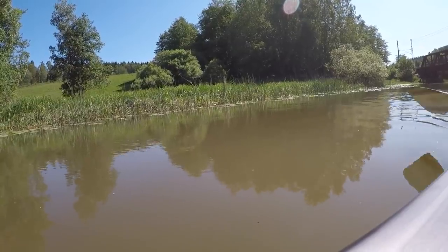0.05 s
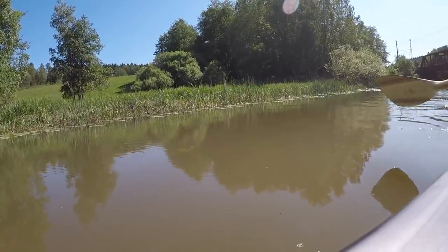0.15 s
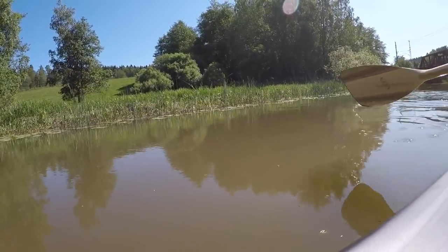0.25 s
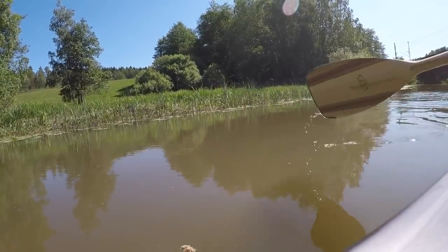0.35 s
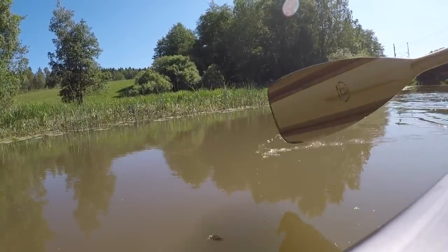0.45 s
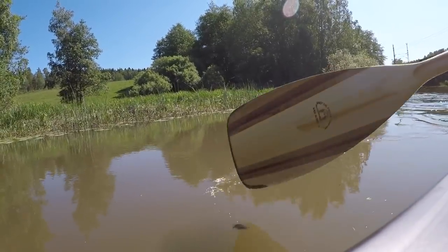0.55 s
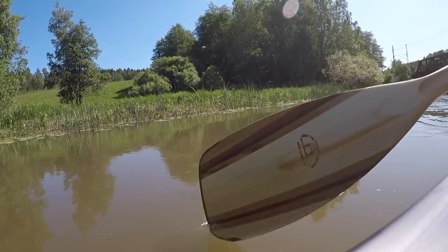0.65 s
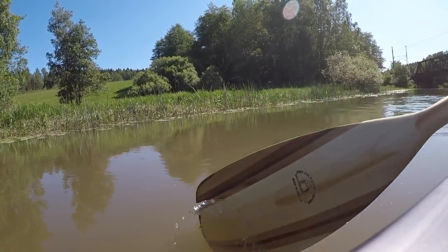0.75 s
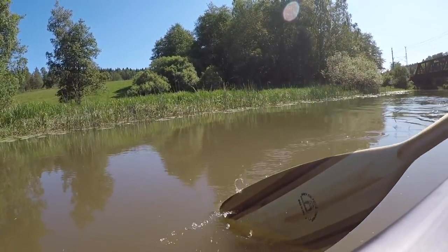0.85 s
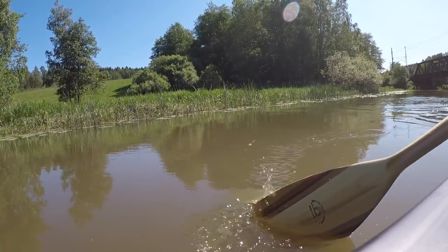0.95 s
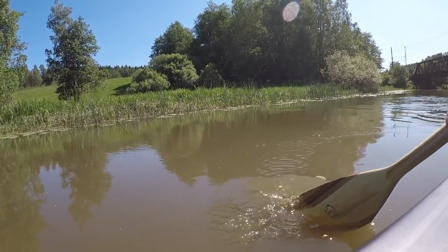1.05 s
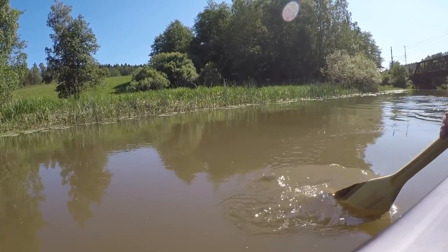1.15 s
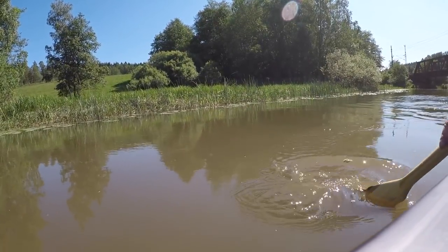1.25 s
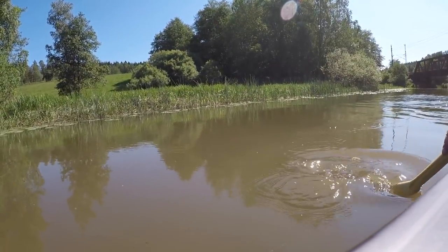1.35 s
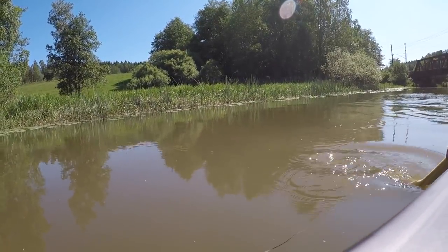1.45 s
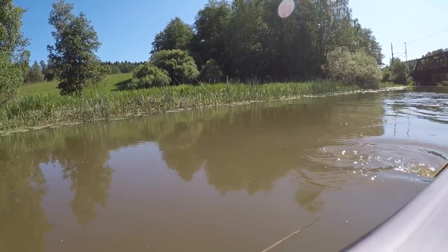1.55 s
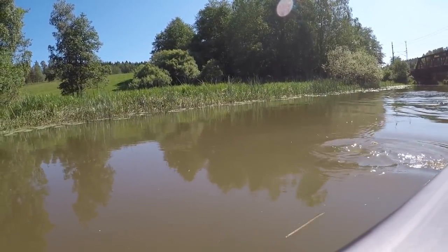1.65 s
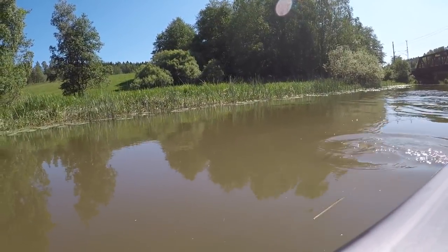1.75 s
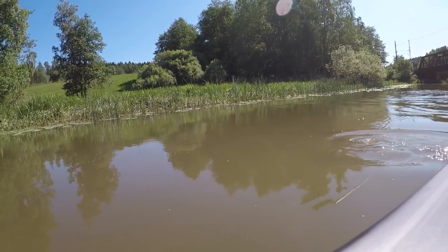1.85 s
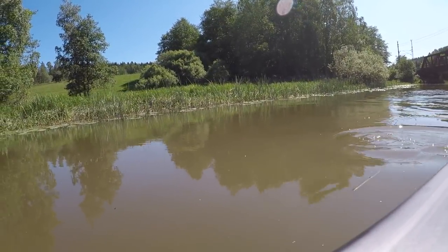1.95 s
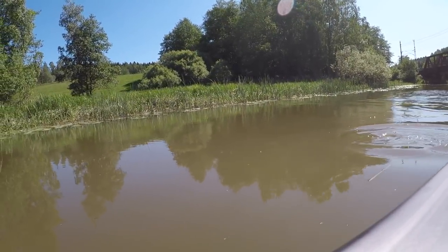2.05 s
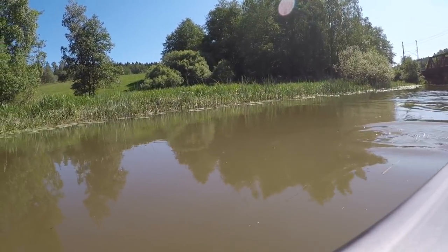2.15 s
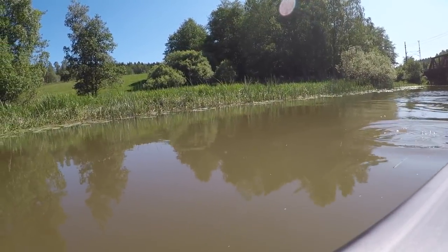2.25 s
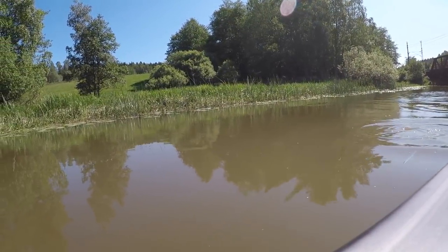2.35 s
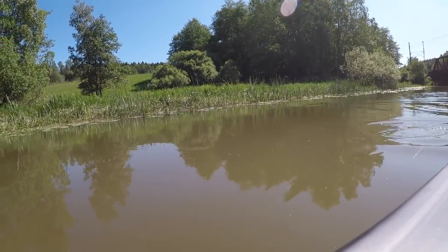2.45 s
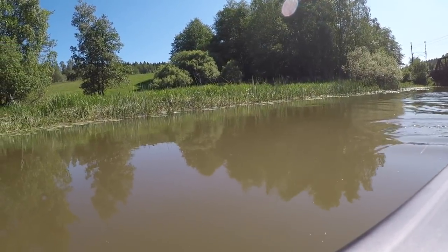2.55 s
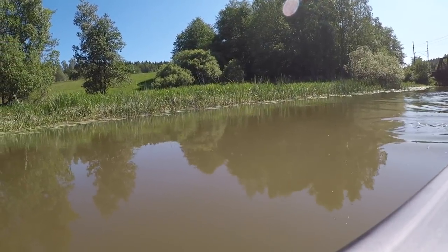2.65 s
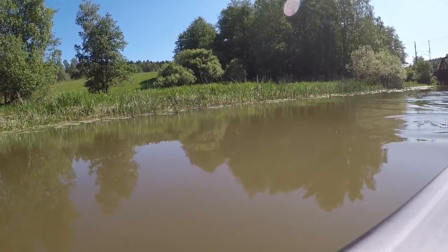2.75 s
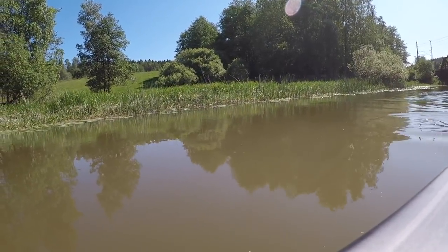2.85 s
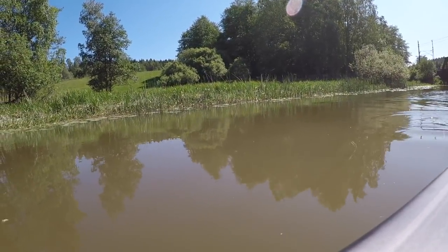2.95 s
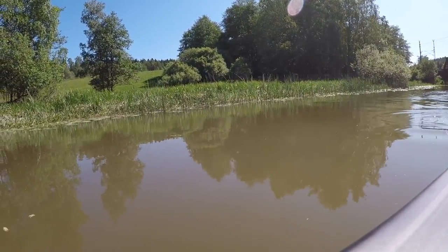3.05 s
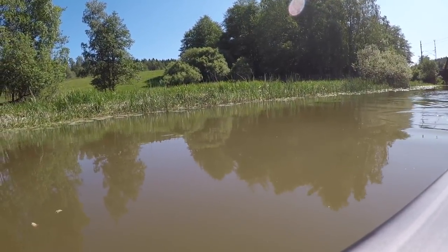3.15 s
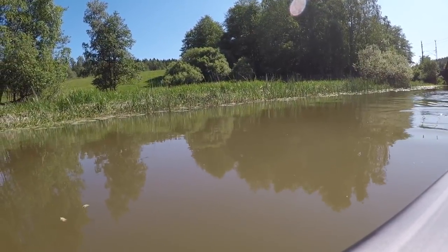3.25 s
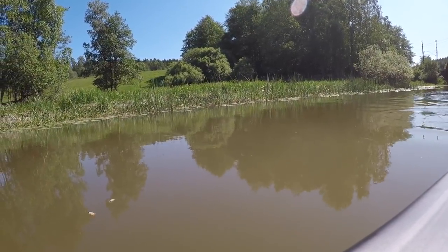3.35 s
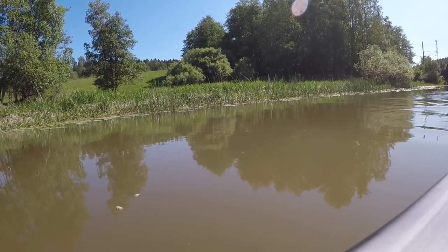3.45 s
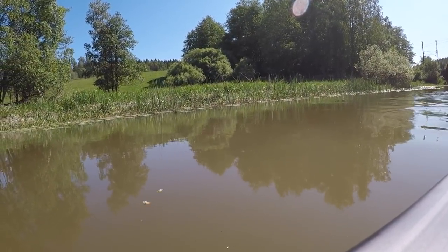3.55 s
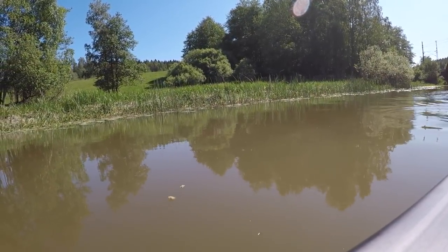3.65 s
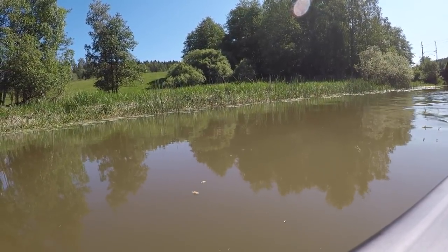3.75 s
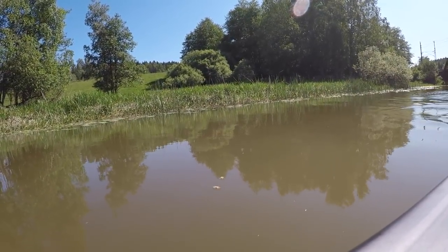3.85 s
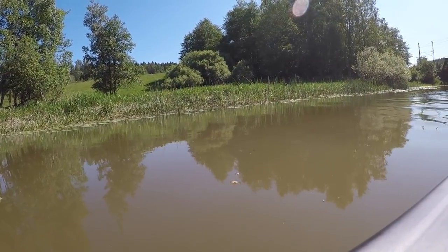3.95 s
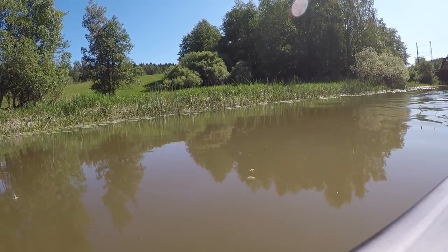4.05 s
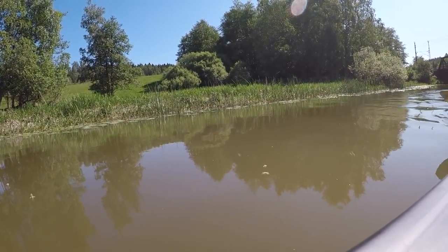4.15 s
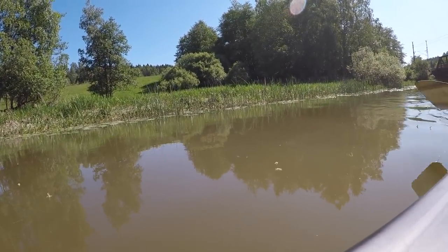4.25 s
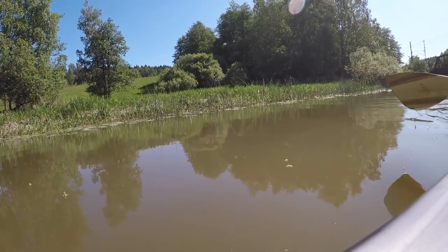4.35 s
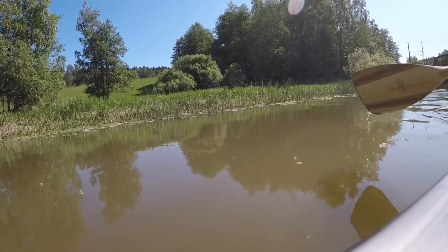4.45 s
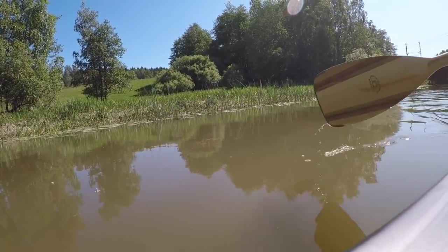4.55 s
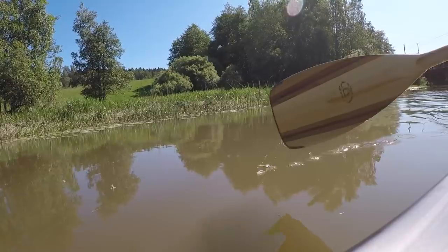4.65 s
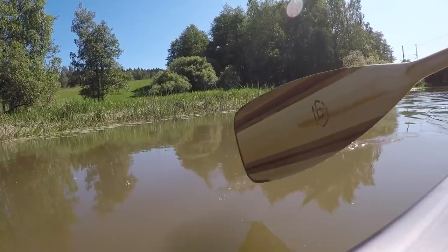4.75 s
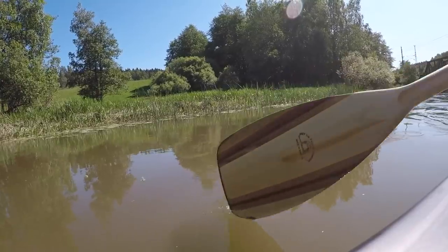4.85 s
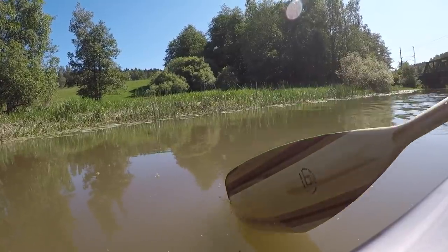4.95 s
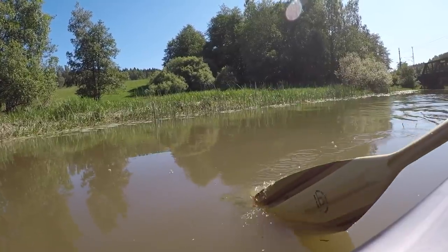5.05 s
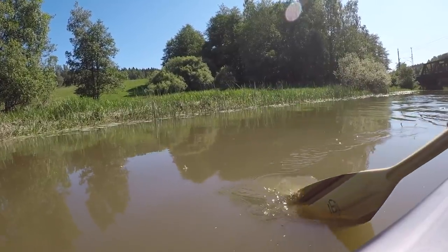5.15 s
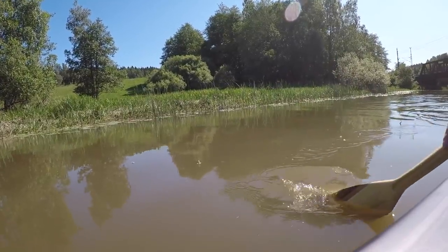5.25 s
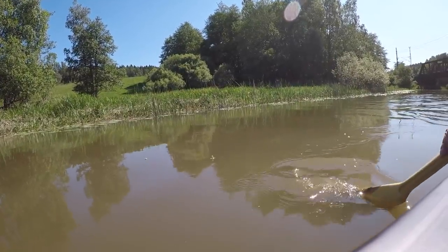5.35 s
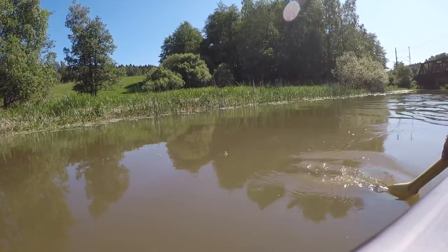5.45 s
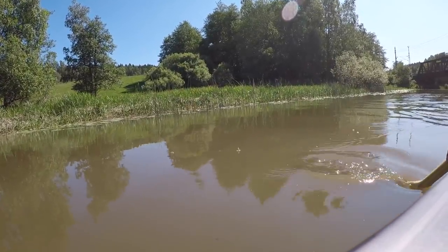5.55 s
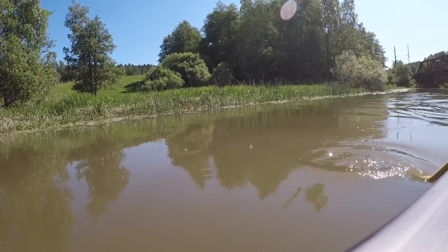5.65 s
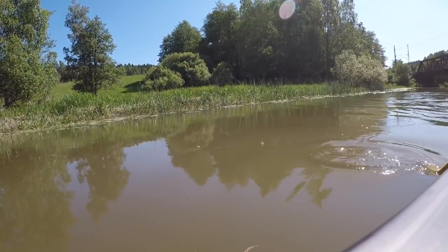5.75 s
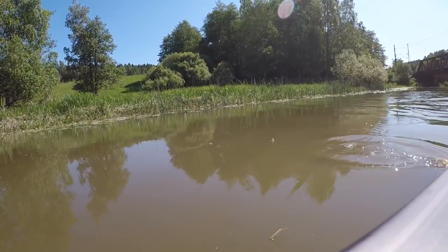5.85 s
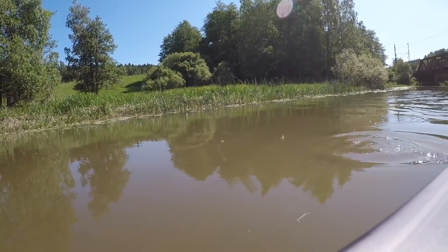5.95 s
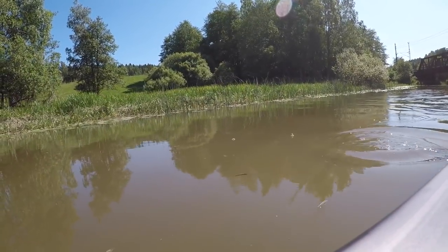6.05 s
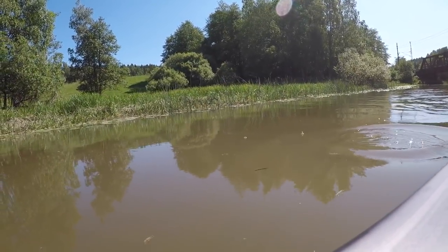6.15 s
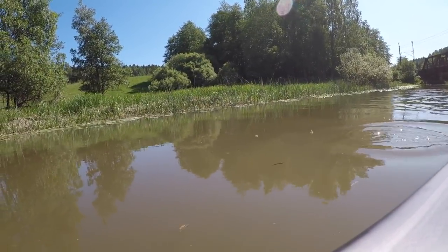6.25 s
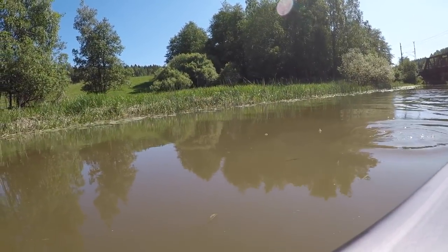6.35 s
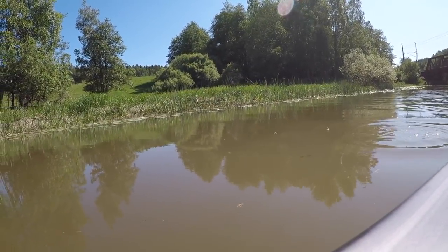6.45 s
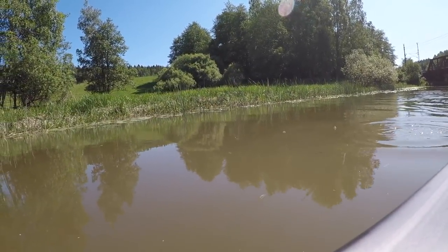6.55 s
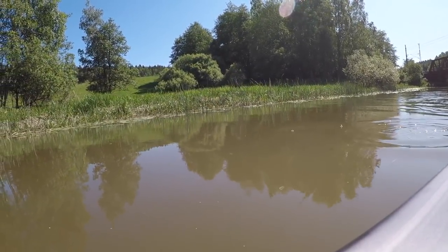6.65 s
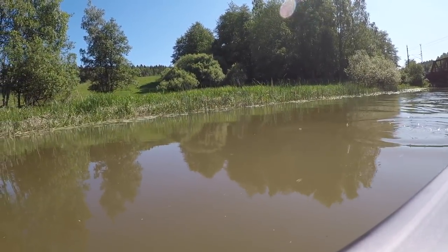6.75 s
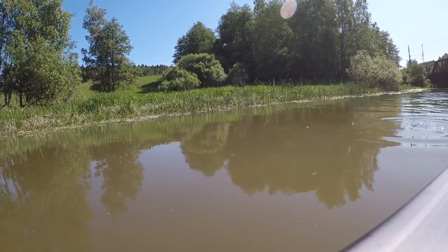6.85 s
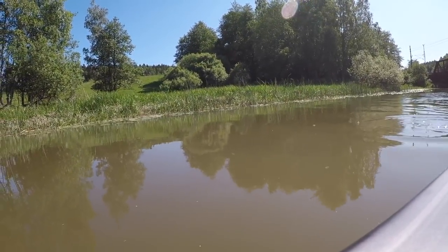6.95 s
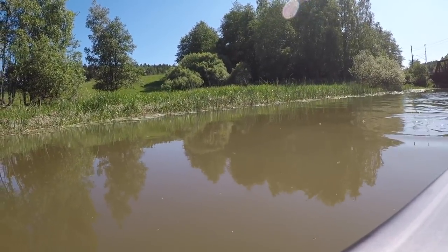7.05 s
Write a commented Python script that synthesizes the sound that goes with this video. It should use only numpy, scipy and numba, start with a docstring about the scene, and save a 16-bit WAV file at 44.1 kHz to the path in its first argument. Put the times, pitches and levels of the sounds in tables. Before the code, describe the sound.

Two slow paddle strokes heard from a small camera fixed to the boat. Each begins with ticking drips and a crisp, gurgling entry, followed by a booming wood-on-hull knock, gritty rubbing and a wavering squeak, then scattered light thumps. Between them is a soft outdoor hush with thin distant chirps and a faint low throbbing. Knocks sit slightly left and briefly push everything else down.

```python
"""A canoe on a calm river, heard by a small two-port camera fixed to the hull.
Drops fall from the lifted paddle blade as short bubbles with ticks of impact, amid spray and low bubbles.
On each stroke the shaft knocks the gunwale, slides squeaking along it and sets the hull modes ringing.
Gliding bird notes, faint tones and a hush of shaped noise lie behind; bumps throb softly in the bass.
The camera's limiter ducks everything after the knocks."""
import sys
import numpy as np
from scipy import signal
from scipy.fft import rfft, irfft
from scipy.io import wavfile
from scipy.ndimage import uniform_filter1d
from numba import njit

SR = 44100
rng = np.random.default_rng(int(sys.argv[2]) if len(sys.argv) > 2 else 0)


def to_wav(sig):
    """Store sig (one row per channel, or 1-D mono) as 16-bit WAV at the path in sys.argv[1].

    Samples outside -1..1 are clipped; the rate is SR.
    """
    pcm = np.clip(np.atleast_2d(sig), -1, 1) * 32767
    pcm = np.round(pcm).astype(np.int16)
    wavfile.write(sys.argv[1], SR, pcm.T)  # frames by channels


N = 313551
T = np.arange(N) / SR

# booming hull panels: (frequency [Hz], mode gain [dB], t60 [s])
PANELS = [(102.8, -12, 0.334), (150.65, 0, 0.255), (185.3, -16, 0.215), (222.1, 1.5, 0.0688),
          (237.77, 2.5, 0.1906), (266.8, 4.5, 0.138), (331.3, -9, 0.12)]
# stiff gunwale modes: (frequency [Hz], mode gain [dB], free t60 [s])
GUNWALE = [(390.5, -3, 0.044), (428.3, 13, 0.03), (572.4, 19.5, 0.0103), (672, 16, 0.01536),
           (772.4, 14.5, 0.0136), (925.4, 10.5, 0.01227), (1024, 2, 0.0174), (1416, -15, 0.022),
           (1545, -13.5, 0.014), (1779, -25, 0.016), (2260, -25, 0.0012), (3150, -27, 0.0044)]
# water and shaft working the hull, one list per spell:
# (time [s], panel gain [dB], gunwale scrape gain [dB], eddy rumble gain [dB], panel pitch [Hz])
WORK = [
    [(1.0, -52, -73, -74, 197), (1.24, -56, -61.5, -74, 170.2), (1.35, -52, -69.5, -77, 193),
     (1.5, -79.5, -77.5, -69, 199.8)],
    [(1.63, -15, -24, -32, 202.5), (1.665, -33.5, -36.5, -24.5, 206.1), (1.7, -22, -32, -36.5, 218),
     (1.82, -29, -31, -36.5, 250), (1.91, -26, -31.5, -37.5, 275.4), (2.12, -27.5, -39.5, -42, 239.5),
     (2.22, -43, -48, -36, 240), (2.3, -35.5, -47.5, -35.5, 261.6), (2.45, -47, -61.5, -43, 220.8),
     (2.65, -41, -52, -39, 271), (2.95, -53.5, -78, -48, 277.6), (3.05, -39, -41.5, -41, 247),
     (3.13, -49, -70, -48, 240.8), (3.19, -33, -58, -48.5, 186.8), (3.35, -60, -64.5, -51.5, 201.6),
     (3.86, -47, -59, -51, 242), (4.35, -90.5, -90, -72.5, 231.3)],
    [(5.67, -31.5, -18.5, -42, 199.9), (5.8, -30.5, -85.5, -36, 191.4), (5.875, -51.5, -70, -44, 219.7),
     (5.895, -17, -25, -37.5, 249), (6.15, -35.5, -37.5, -35.5, 257), (6.27, -27.5, -33.5, -49.5, 248.5),
     (6.41, -23.5, -40, -34.5, 268.5), (6.57, -51.5, -53, -39, 230), (6.85, -33.5, -50.5, -38.5, 284.8),
     (6.93, -55, -62, -52.5, 259), (7.11, -73.5, -63, -44.5, 248)],
]


def undb(db):
    """Decibels to gain."""
    return 10 ** (np.asarray(db) / 20)


def level(x, db):
    """Scale to an rms level."""
    return x * undb(db) / np.sqrt(np.mean(x ** 2))


def along(table, hz):
    """Read (Hz, value) points on a log-frequency axis."""
    f, v = np.transpose(table)
    return np.interp(np.log(np.maximum(hz, 1)), np.log(f), v)


def gains(tables, column):
    """Gain curve from the dB column of several tables, silent between them."""
    out = np.zeros(N)
    for rows in tables:
        s, db = np.array(rows)[:, 0], np.array(rows)[:, column]
        fade = np.clip(np.minimum(T - s[0], s[-1] - T) / .008, 0, 1)
        out += undb(np.interp(T, s, db)) * fade
    return out


def band(x, lo_hz, hi_hz):
    """Band-pass."""
    return signal.sosfilt(signal.butter(2, [lo_hz, hi_hz], "bandpass", fs=SR, output="sos"), x)


def walk(rate_hz):
    """Random levels held 1 / rate_hz seconds and slewed twice; spread near 1."""
    k = int(SR / rate_hz)
    held = np.repeat(rng.standard_normal(N // k + 1), k)
    return 1.3 * uniform_filter1d(uniform_filter1d(held, k), k)[:N]


def ring(x, modes, near_hz=None):
    """Drive decaying modes: mostly those near a moving pitch if given, else with alternating signs."""
    reach_db_per_octave = 23  # drive lost away from near_hz
    out, sense = 0, (1, -1 if near_hz is None else 1)
    for k, (hz, db, t60_s) in enumerate(modes):
        pole = np.exp(2j * np.pi * hz / SR - np.log(1000) / (t60_s * SR))
        drive = x
        if near_hz is not None:
            drive = x * undb(-reach_db_per_octave * np.abs(np.log2(near_hz / hz)))
        out = out + sense[k % 2] * undb(db) * signal.lfilter([1], [1, -pole], drive).imag
    return out


def pan(x, db):
    """Split over the two ports; db is left minus right."""
    return x * undb(np.array([db, -db]).reshape(2, -1) / 2)


def bubble(hz, t60_s, glide):
    """A fading sine that rises as the bubble nears the surface."""
    t = np.arange(int(t60_s * SR) + 8) / SR
    tone = np.sin(2 * np.pi * hz * t * (1 + glide * t / t60_s))
    onset = np.minimum(t * hz / 0.72, 1)
    return tone * 1000 ** (-t / t60_s) * onset


def add(out, s, grain):
    """Mix a grain in at time s."""
    i = int(s * SR)
    out[..., i:i + grain.shape[-1]] += grain[..., :N - i]


@njit
def follow(x, attack, release):
    """Envelope with one smoothing step for rises and another for falls."""
    e, out = 1e-6, np.empty(len(x))
    for i in range(len(x)):
        e += (x[i] - e) * (attack if x[i] > e else release)
        out[i] = e
    return out


def hush():
    """Leaves, air and the far landscape: smooth noise, most alike at the two ports in the bass."""
    # spectrum: (frequency [Hz], relative density [dB])
    hush_spectrum = [(12, -69), (20, -20.5), (112, -28.5), (138, -3.5), (244, -5), (296, -7), (321, -11),
                     (488, -9), (560, -9), (850, -13.5), (1190, -19.5), (2300, -25.5), (3600, -28),
                     (7410, -29), (12600, -36.5), (15300, -55.5)]
    # port likeness: (frequency [Hz], power share common to both ports [1])
    likeness = [(20, 0.896), (130, 1), (250, 0.312), (600, 0.86), (1500, 0.054), (3000, 0.12), (7000, 0.1),
                (15000, 0.12)]
    hush_db = -46.5
    hz = np.fft.rfftfreq(N, 1 / SR)
    common, left, right = rfft(rng.standard_normal((3, N))) * undb(along(hush_spectrum, hz))
    share = np.clip(along(likeness, hz), 0, 1)
    both = irfft(np.sqrt(share) * common + np.sqrt(1 - share) * np.array([left, right]), N)
    drift_db = 0.3 * walk(1.5) + .5 * walk(23)
    return level(both * undb(drift_db), hush_db)


def chirps():
    """Far buzzy birds: gliding phrases made of fast, uneven downstrokes."""
    # phrases: (start [s], relative level [dB], from [Hz], to [Hz], length [s])
    phrases = [(.09, -65, 6000, 5830, 0.029), (0.128, -66, 5400, 4950, .04), (.14, -66, 3780, 3583, .08),
               (0.262, -67, 5400, 4900, 0.037), (0.39, -65, 5450, 4850, 0.0414),
               (.52, -61.5, 5440, 4950, 0.042), (0.648, -57.5, 5500, 4970, 0.055),
               (0.775, -55, 5620, 4950, 0.074), (.905, -62, 5580, 4920, 0.0515),
               (1.035, -59, 5500, 4870, 0.044), (1.165, -61, 5600, 4954, 0.038),
               (1.293, -61.5, 5550, 4950, 0.046), (1.35, -65.5, 7070, 6760, .09),
               (1.425, -61.5, 5700, 4900, 0.0425), (2.85, -62.5, 2685, 2470, 0.0257),
               (3.03, -65, 7000, 7200, 0.037), (3.085, -64.5, 3950, 3170, 0.11),
               (3.8, -68.5, 6100, 6000, 0.245)]
    mean_buzz_hz, stroke_span_hz, waver_share = 138.2, 900, 0.043
    out, waver = np.zeros(N), walk(220)
    for s, db, from_hz, to_hz, length_s in phrases:
        t = np.arange(int(length_s * SR)) / SR
        drift = 1 + waver_share * waver[int(s * SR):][:len(t)]
        stroke = np.cumsum(mean_buzz_hz * drift ** 4 / SR) % 1
        sweep_hz = drift * np.linspace(from_hz, to_hz, len(t)) + stroke_span_hz * (.5 - stroke)
        sweep = np.sin(2 * np.pi * np.cumsum(sweep_hz) / SR)
        shape = np.sin(np.pi * stroke) ** 2 * np.hanning(len(t)) ** .5
        add(out, s, undb(db) * 4 * sweep * shape)
    return out


def throb():
    """One smooth bump each period, of uneven size, stronger with the eddies; a short ring a little higher."""
    period_s, bump_s = .10245, 0.00614
    base_db, over_eddy_db, scatter_db, ring_over_base_db = -44.5, 6.5, 3, 11.5
    ticks = np.zeros(N)
    at = (np.arange(1, N / SR / period_s) * period_s * SR).astype(int)
    ticks[at] = undb(scatter_db * rng.standard_normal(len(at)))
    bumps = np.convolve(ticks, np.hanning(int(bump_s * SR)), "same")
    low = band(bumps, 22, 160) * (undb(base_db) + undb(over_eddy_db) * gains(WORK, column=3))
    return low + undb(base_db + ring_over_base_db) * band(bumps, 135.8, 245)


def swarm(gain, lo_hz, hi_hz, cycles, glide, db, count):
    """Many bubbles of random pitch, size, side and length, most of them weak or short."""
    out = np.zeros((2, N))
    for when, pitch, size, side, length in rng.random((count, 5)):
        hz = lo_hz * (hi_hz / lo_hz) ** pitch
        t60_s = cycles * (1 + 12.0 * length ** 2) / hz
        grain = bubble(hz, t60_s, glide) * undb(-3.5 * np.log(max(size, .08)))
        add(out, when * N / SR, pan(grain, 8 * (side - .5)))
    return level(out, db) * gain


def spray():
    """Fine droplets above; below, small bubbles that trickle and burst around the bigger drops; low bubbles."""
    # spray and trickle off the blade, one list per lift: (time [s], gain [dB])
    spray_curves = [
        [(0.2, -57), (0.46, -62.5), (0.88, -60.5), (0.996, -56), (1.13, -49), (1.35, -59.5), (1.5, -89)],
        [(4.3, -75), (4.534, -64.5), (4.914, -64.5), (5.208, -44.5), (5.508, -59.5), (5.6, -66)],
    ]
    # bursts of small bubbles around the bigger drops: (time [s], gain [dB])
    burst_rows = [(0.796, -33), (0.875, -49.5), (1.051, -44.5), (1.114, -53), (4.966, -33.5),
                  (5.146, -44.5), (5.198, -49.5), (5.245, -52), (5.29, -57.5)]
    # lower, longer bubbles, alone or under a drop: (time [s], start pitch [Hz], level [dB], t60 [s])
    low_bubbles = [(.825, 1732, -29.5, 0.036), (.872, 827, -38, 0.034), (.874, 1266, -44, .03),
                   (1.05, 695.4, -36.5, 0.112), (1.125, 935, -43, 0.123), (1.205, 1272, -42, 0.107),
                   (1.325, 1137, -40, 0.035), (4.787, 1300, -42, 0.034), (4.826, 1314, -40.5, 0.0435),
                   (4.828, 876, -44.5, .03), (4.855, 1336, -40.5, 0.046), (4.865, 905, -44, 0.053),
                   (4.96, 944, -32, 0.034), (4.962, 2397, -30.5, .03), (4.963, 2022, -35.5, 0.032),
                   (4.963, 397.5, -36.5, 0.066), (5.017, 1980, -49, 0.025), (5.143, 1122, -26, 0.03),
                   (5.165, 499, -36, 0.055), (5.201, 1132, -29, 0.022), (5.221, 1587, -40, 0.027),
                   (5.245, 1749, -38, 0.037), (5.3, 1071, -40.5, 0.064), (5.386, 1284, -44.5, 0.042)]
    rise_s, fall_s, low_trickle_db = 0.0018, 0.01307, -11.5  # e-fold times of a burst
    trickle = gains(spray_curves, column=1)
    bursts = sum(undb(db) * np.exp(np.minimum((T - s) / rise_s, (s - T) / fall_s)) for s, db in burst_rows)
    low_gain = undb(low_trickle_db) * trickle + bursts
    out = swarm(trickle, 1235, 8660, 14.0, glide=0.12, db=-7.0, count=4000)
    out = out + swarm(low_gain, 578.3, 2177, 2.74, glide=0.062, db=7.0, count=3000)
    for s, hz, db, t60_s in low_bubbles:
        add(out, s, pan(undb(db) * bubble(hz, t60_s, glide=0.06), -11.0))
    return band(out, 300, 11000)


def drops():
    """Each drop: a tick of impact, a short ragged bubble and a scatter of droplets thrown up around it."""
    # drops hitting the water: (time [s], level [dB], bubble pitch [Hz], relative impact tick [dB])
    drop_rows = [(0.3126, -37, 1994, -12), (0.342, -33, 2057, -5.5), (0.398, -29, 6170, -24.5),
                 (0.454, -29, 7040, -17.5), (0.4658, -29.5, 7050, -18.5), (0.4934, -32.5, 5730, -16),
                 (.554, -30.5, 6000, -15), (0.5658, -28.5, 6620, -8.5), (0.605, -32.5, 6220, -13),
                 (.621, -36, 5120, -5.5), (0.631, -24, 6400, -15.5), (0.65, -25, 6840, -14),
                 (0.674, -23, 3350, 4), (0.7947, -16.5, 1322, -9.5), (0.8087, -26.5, 3050, 8.5),
                 (0.818, -17.5, 1930, -24), (0.871, -37, 1282, -7), (0.8812, -24.5, 4410, -13),
                 (0.9704, -28, 6800, 2.5), (0.973, -36, 5960, -3), (0.981, -25.5, 1887, -4),
                 (0.979, -16.5, 6750, -4.5), (1.0076, -30.5, 6300, -19), (1.0284, -30.5, 2110, -7),
                 (1.054, -26, 7010, -11.5), (1.062, -19, 7090, -23.5), (1.0896, -26, 3674, -1.5),
                 (1.114, -33.5, 1088, -5.5), (1.1754, -22, 3010, -11.5), (1.206, -39.5, 3950, 6),
                 (1.25, -44, 2920, -3), (1.266, -38, 2820, -5.5), (1.283, -39, 2510, 0.5),
                 (4.195, -39.5, 6600, -14.5), (4.29, -44.5, 4800, -6), (4.33, -39, 6350, -5.5),
                 (4.345, -46.5, 4200, -5.5), (4.485, -36, 6230, -14.5), (4.54, -24.5, 5980, -7),
                 (4.576, -33.5, 6100, -17.5), (4.669, -38, 6040, -15), (4.686, -29.5, 6290, -19),
                 (4.711, -27, 4966, -8.5), (4.7361, -35, 2685, -11), (4.787, -32, 2030, -3),
                 (4.806, -36, 7120, -23), (4.828, -33.5, 1990, 4), (4.836, -35.5, 5800, -6),
                 (4.851, -37.5, 4200, -14), (4.856, -30.5, 1970, 3.5), (4.877, -22.5, 6360, -13),
                 (4.879, -27, 3770, -10), (4.882, -23.5, 6170, -11), (4.902, -18, 6470, -13.5),
                 (4.92, -43, 4520, -13.5), (4.9635, -10.5, 1526, -38), (4.97, -23, 3735, -10),
                 (5.0181, -35.5, 1033, -4.5), (5.0741, -37.5, 3630, 2.5), (5.123, -31.5, 5230, -17.5),
                 (5.125, -33, 2410, -19), (5.133, -20.5, 6650, -24.5), (5.1436, -4, 2005, -11),
                 (5.188, -30, 2510, -17.5), (5.191, -23.5, 5730, -14.5), (5.196, -20.5, 1207, -10.5),
                 (5.197, -17.5, 2420, 0), (5.203, -24.5, 7000, -15.5), (5.2103, -16.5, 6970, -7.5),
                 (5.215, -33, 4440, 3.5), (5.223, -24.5, 5800, -1.5), (5.244, -22.5, 5920, -5.5),
                 (5.257, -29, 3550, -17.5), (5.2804, -25.5, 2598, -5), (5.283, -25.5, 3497, -6),
                 (5.2929, -31, 3200, -8.5), (5.34, -36, 2364, -1.5), (5.357, -40.5, 4945, 7.5),
                 (5.411, -36, 1875, 6.5)]
    # loud drops burst briefly, soft ones linger: (drop level [dB], longest fade [s])
    fade_by_level = [(-46, 0.03), (-22.5, 0.027), (-8, 0.017)]
    # (bubble pitch [Hz], left minus right [dB])
    drop_pan = [(1400, -9), (1750, -5), (2100, 0.5), (3000, -5.5), (4400, 0), (6500, 4)]
    splash_cycles = 59.7  # caps the splash fade of small, high bubbles
    out = np.zeros((2, N))
    t = np.arange(int(0.053 * SR)) / SR
    for s, db, hz, tick_db in drop_rows:
        fade_s, pan_db = np.interp(db, *np.transpose(fade_by_level)), along(drop_pan, hz)
        s = s - .0006  # the burst builds up before its peak
        noise, thrown = rng.standard_normal((2, len(t))), rng.random((9, 3))
        tick = undb(tick_db + 0.5) * band(noise[0] * np.exp(-t / 0.001366), 2820, 6906)
        tick = tick + undb(tick_db - 13.0) * band(noise[0] * np.exp(-t / 0.0042), 1100, 2500)
        splash_fade = np.exp(-t * 2.7 / np.clip(fade_s, .002, splash_cycles / hz))
        splash = undb(-4.0) * band(noise[1] * splash_fade, 0.889 * hz, 1.008 * hz)
        add(out, s, pan(undb(db) * (tick + splash), pan_db))
        add(out, s, pan(undb(db - 3.0) * bubble(hz, min(fade_s, 30 / hz), glide=0.038), pan_db))
        for late, pitch, size in thrown:
            droplet_hz = min(hz * 3.0 ** pitch, 7500)
            droplet = undb(db - 13 - 8.0 * size) * bubble(droplet_hz, 14 / droplet_hz, glide=0.043)
            add(out, s + 0.5 * late * fade_s, pan(droplet, pan_db))
    return band(out, 580, 7030)


def knocks():
    """A short contact edge clicks in the gunwale; a slower flex of the hull booms in the panels."""
    # knocks on the hull and softer low thumps:
    # (time [s], click drive [dB], boom minus click drive [dB], panel pitch [Hz])
    knock_rows = [(.912, -54.5, 15.5, 174), (1.222, -53, 18, 163.2), (1.326, -50, 16, 195),
                  (1.429, -58, 12, 165.4), (1.583, -38.5, 27, 130.4), (1.603, -9.5, 14.5, 224.7),
                  (1.675, -14, 13.5, 217.8), (1.878, -28.5, 25.5, 96), (2.028, -29, 1, 250),
                  (2.097, -25.5, -5.5, 221), (2.118, -29, 1, 202.5), (2.214, -36.5, 2.5, 248),
                  (2.223, -44.5, 37.5, 96.9), (2.277, -29.5, -9, 271.3), (2.5, -50, 4, 265),
                  (2.631, -48, 11.5, 266), (2.689, -46.5, 7, 257), (2.781, -35.5, -3.5, 268),
                  (2.89, -53, 7.5, 268), (2.995, -24, 6, 291), (3.046, -46.5, 6, 149),
                  (3.152, -25, 0.5, 281.4), (3.164, -35.5, 8.5, 148.8), (3.274, -61.5, 14.5, 119.5),
                  (3.753, -48.5, 15, 261.3), (3.861, -48.5, 6, 254), (5.63, -42.5, 23.5, 137.4),
                  (5.648, -10.5, 17, 201.2), (5.679, -19.5, 16.5, 194.9), (5.885, -13, 12.5, 219),
                  (5.911, -35, 26, 141.6), (6.185, -35.5, 10.5, 248), (6.216, -26.5, 8, 256),
                  (6.246, -40.5, 25, 100), (6.324, -48.5, 19.5, 109.1), (6.365, -30, 9.5, 264),
                  (6.37, -38, 19.5, 110), (6.507, -49.5, 20.5, 224), (6.676, -31, -2.5, 256),
                  (6.695, -31, -6.5, 260.3), (6.751, -29, -3, 268), (6.821, -25.5, -2.5, 269),
                  (6.834, -42, 7, 150.5)]
    flex_cycles = 2.307  # swings of the hull before it rings free
    boom, click = np.zeros(N), np.zeros(N)
    for s, db, boom_db, hz in knock_rows:
        push = np.hanning(int(flex_cycles * SR / hz))
        flex = push * np.sin(2 * np.pi * hz * np.arange(len(push)) / SR) / push.sum()
        contact_s = np.interp(db, [-16, -10], [.001, .00035])  # harder knocks touch more briefly
        edge = np.hanning(int(SR * contact_s))
        add(click, s, undb(db) * edge / edge.sum())
        add(boom, s, undb(db + boom_db) * flex)
    s, _, _, hz = np.transpose(knock_rows)
    panel_hz = hz[np.maximum(np.searchsorted(s, T) - 1, 0)]
    body = undb(7.0) * ring(boom, PANELS, panel_hz) + undb(2.5) * ring(click, GUNWALE)
    return band(body, 108, 3400)


def hull():
    """Water works the panels and the sliding shaft scrapes the gunwale in fine grains."""
    swirl_apart = 0.392  # drive of opposite sign at the ports, relative to the common drive
    # the pressed shaft damps the gunwale (share of t60) and brightens the scrape
    scrape_damping, tilt_db_per_octave = 0.882, 2.5
    common, apart = rng.standard_normal((2, N))
    push = (common + swirl_apart * apart * np.array([[1], [-1]])) * undb(2.54 * walk(30))
    panel_hz = np.interp(T, *np.vstack(WORK).T[[0, 4]])
    swirl = level(ring(push, PANELS, panel_hz), 1.7)
    grit = rng.standard_normal(N) * (rng.random(N) < 6000 / SR) * undb(3.3 * walk(30))
    pressed = [(hz, db + tilt_db_per_octave * np.log2(hz / 500), scrape_damping * t60_s)
               for hz, db, t60_s in GUNWALE]
    scrape = level(ring(uniform_filter1d(grit, size=8), pressed), 8.95)  # wet wood makes soft grains
    return swirl * gains(WORK, column=1) + band(scrape, 200, 1500) * gains(WORK, column=2)


def deep():
    """Low rumble of eddies under the hull: unsteady band-passed noise."""
    rumble = band(rng.standard_normal(N), 18.2, 134.6) * undb(3.83 * walk(9.6))
    return level(rumble, 0) * gains(WORK, column=3)


def squeak():
    """Stick-slip of shaft on gunwale at an unsteady rate: a rough, wavering tone with its octave."""
    # slides: (time [s], mean slip rate [Hz], gain [dB])
    slides = [
        [(1.68, 544.8, -31), (1.788, 551.9, -36.5), (1.83, 519.3, -35.5)],
        [(1.835, 477.9, -38.5), (1.86, 530.8, -41), (1.895, 508.5, -31), (1.905, 467, -44),
         (1.92, 466.2, -24.5), (1.96, 452.2, -50.5)],
        [(5.9, 653.4, -26), (5.935, 603.8, -37.5), (5.968, 565.7, -28.5), (6.042, 496.5, -40.5),
         (6.05, 501, -45), (6.078, 475.4, -33.5), (6.14, 460.5, -39.5), (6.168, 430, -45), (6.2, 438, -59)],
    ]
    # partials: (multiple of slip rate [1], gain [dB])
    partials = [(1, 22), (2, -11)]
    s, hz, _ = np.vstack(slides).T
    slip_hz = np.interp(T, s, hz) * (1 + .006 * walk(90))
    phase = 2 * np.pi * np.cumsum(slip_hz) / SR
    tone = sum(undb(db) * np.sin(k * phase) for k, db in partials)
    return tone * undb(1.3 * walk(60)) * gains(slides, column=2)


def tones():
    """Faint narrow wavering tones of filtered noise, fading in and out."""
    # (start [s], end [s], centre [Hz], width [Hz], level before fades [dB], sign at the left port [1])
    tone_rows = [(2.55, 3.13, 960, 16, -62, -1), (2.55, 3.13, 2265, 16, -71, 1),
                 (6.46, 7.2, 960, 16, -62, -1), (6.46, 7.2, 2265, 16, -69, 1),
                 (1.8, 2.36, 4400, 20, -70, 1)]
    out = 0
    for start, end, hz, width_hz, db, left in tone_rows:
        tone = level(band(rng.standard_normal(N), hz - width_hz / 2, hz + width_hz / 2), db)
        fade = np.clip(np.minimum(T - start, end - T) / 0.014, 0, 1)
        out = out + np.array([[np.sign(left)], [1]]) * tone * fade
    return out


def birds():
    """Thin whistled notes from the far bank, each a glide that swells fast and fades."""
    # (start [s], length [s], from [Hz], to [Hz], relative level [dB], bend [1]: <1 moves most at the start)
    notes = [(2.332, 0.028, 6090, 6160, -62, 1), (2.37, 0.021, 6150, 6110, -61, 0.87),
             (2.396, 0.049, 5900, 5370, -62, 0.84), (2.439, 0.0486, 5375, 5310, -60.5, 0.49),
             (2.535, 0.0104, 2910, 3300, -61.5, 0.96), (2.576, 0.0116, 3285, 3520, -57, 0.97),
             (2.652, 0.051, 6098, 6108, -46.5, 1.1), (2.701, 0.063, 6060, 6066, -59.5, 0.95),
             (2.761, 0.0192, 5700, 6200, -55, 0.41), (2.779, 0.038, 5810, 4750, -55.5, 1.3),
             (2.81, 0.04, 5400, 5050, -61.5, 0.37), (2.84, 0.0153, 3030, 3600, -60, 0.94),
             (2.919, 0.024, 4830, 5450, -60, 0.6), (2.934, 0.029, 5400, 4990, -63, 1.9),
             (2.977, 0.0164, 3456, 2890, -54, 1.04), (3.29, .04, 3650, 4130, -66.5, 1.5),
             (4.189, 0.094, 2750, 2550, -64, .7)]
    attack_share = 0.33
    out = np.zeros(N)
    for s, length_s, from_hz, to_hz, db, bend in notes:
        u = np.arange(int(length_s * SR)) / (length_s * SR)
        shape = np.interp(u, [0, attack_share, 1], [0, 1, 0]) ** 0.393
        glide_hz = from_hz + (to_hz - from_hz) * u ** bend
        add(out, s, undb(db) * shape * np.sin(2 * np.pi * np.cumsum(glide_hz) / SR))
    return np.sqrt(2) * out * undb(2.92 * walk(80))


def scene():
    """Mix all layers; the hull sounds mostly favour the left port, by an amount that varies with pitch."""
    # (frequency [Hz], left minus right [dB])
    hull_pan = [(90, 1.5), (150, 3.5), (200, 10), (240, 3), (280, -0.12), (350, 6), (450, 7), (550, 4),
                (750, 1.5), (1400, 0.78), (1700, 4), (3000, 7)]
    hull_pan_db = along(hull_pan, np.fft.rfftfreq(N, 1 / SR))
    body = irfft(pan(rfft(knocks() + hull() + squeak()), hull_pan_db), N)
    bass = pan(deep() + throb(), 1.6)
    far = pan(birds() + chirps(), 1.2) + tones() + hush()
    return body + bass + drops() + spray() + far


def record(dry):
    """The left path turns the phase; three gain stages duck both ports, peaks clip, the top is cut."""
    # (frequency [Hz], phase by which left leads [rad])
    port_lead = [(20, -0.5), (45, -0.55), (90, 1.1861), (150, 0.7668), (200, -1.5547), (240, -2.0),
                 (280, -1.913), (350, -1.75), (450, -3), (550, -3), (750, -3.5), (1000, -2.5), (1250, -4.0),
                 (1450, -4.5), (2200, -5.5), (3000, -6.5), (4400, -6.5), (6500, -7.5), (16000, -8.5)]
    full_scale, top_hz = .98, 15200
    turn = np.exp(1j * along(port_lead, np.fft.rfftfreq(N, 1 / SR)))
    ports = np.array([irfft(rfft(dry[0]) * turn, N), dry[1]])
    stages = [(2.5, 5.7, 0.001035, 0.13),  # overload limiter
              (-18, 1.615, 0.00562, 0.244),  # quick compressor
              (-34.5, 1.1051, 0.0393, 0.516)]  # slow gain control
    for threshold_db, ratio, attack_s, release_s in stages:
        envelope = follow(np.abs(ports).max(axis=0), 1 / (attack_s * SR), 1 / (release_s * SR))
        gain = np.minimum(undb(threshold_db) / envelope, 1) ** (1 - 1 / ratio)
        ports = ports * uniform_filter1d(gain, size=120)  # the gain glides, never steps
    clipped = np.clip(ports, -full_scale, full_scale)
    return signal.sosfilt(signal.ellip(8, .2, 70, top_hz, fs=SR, output="sos"), clipped)


dry = scene()
out = record(dry)
to_wav(out)
```